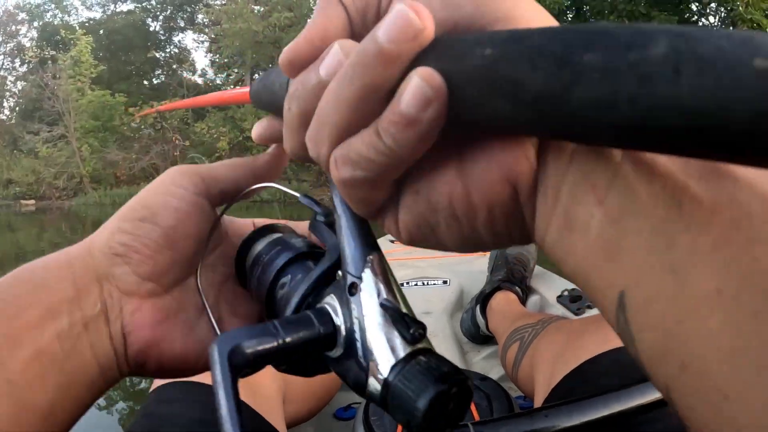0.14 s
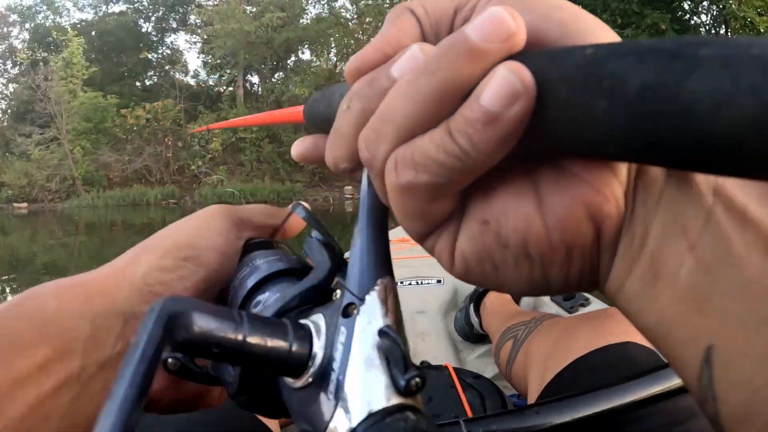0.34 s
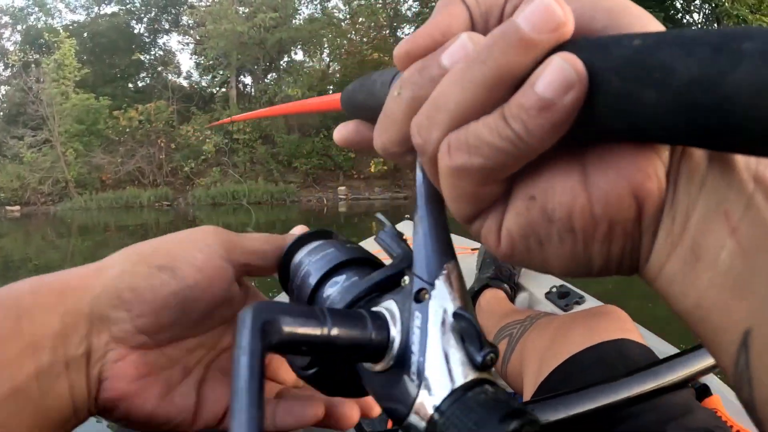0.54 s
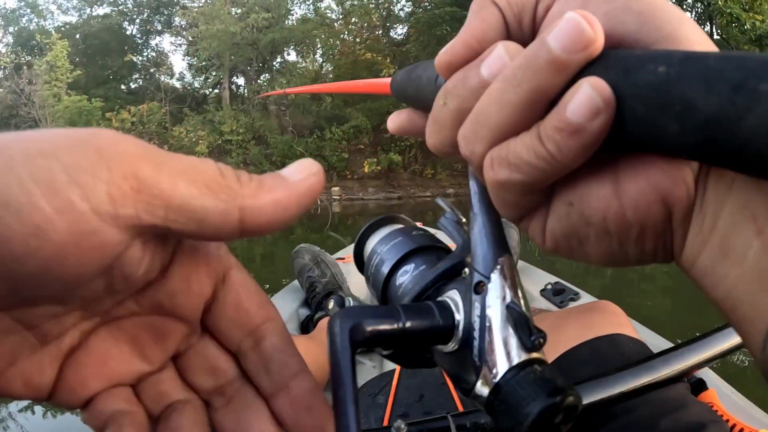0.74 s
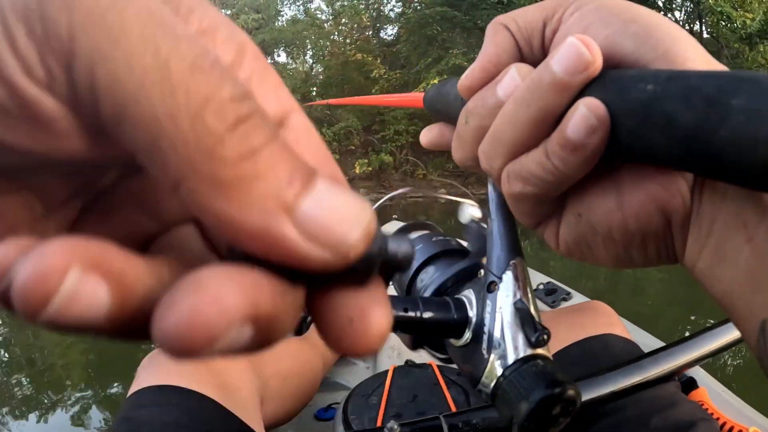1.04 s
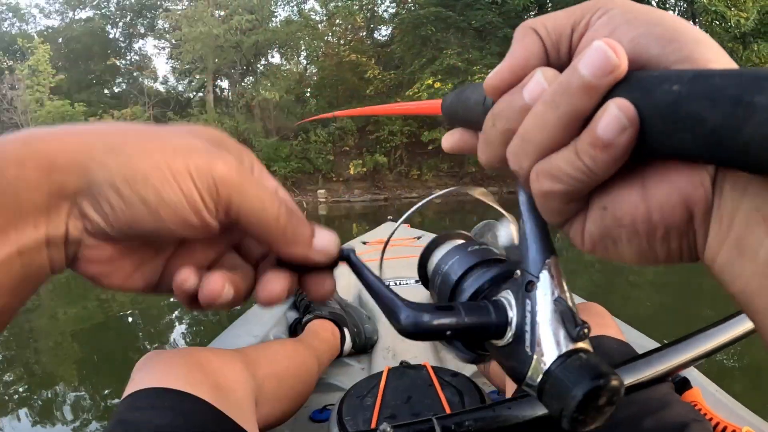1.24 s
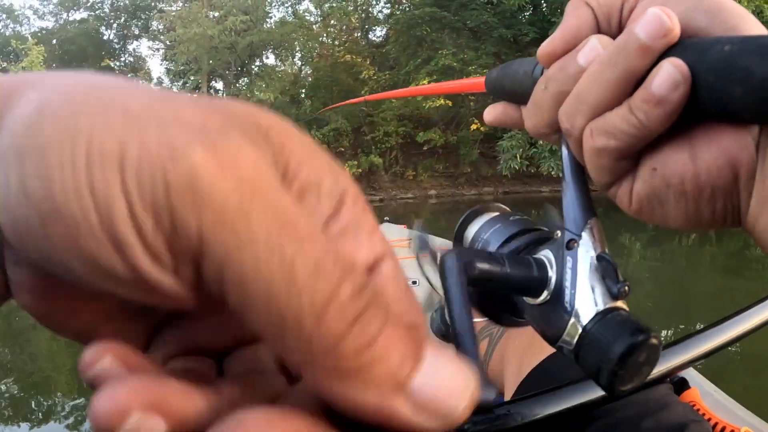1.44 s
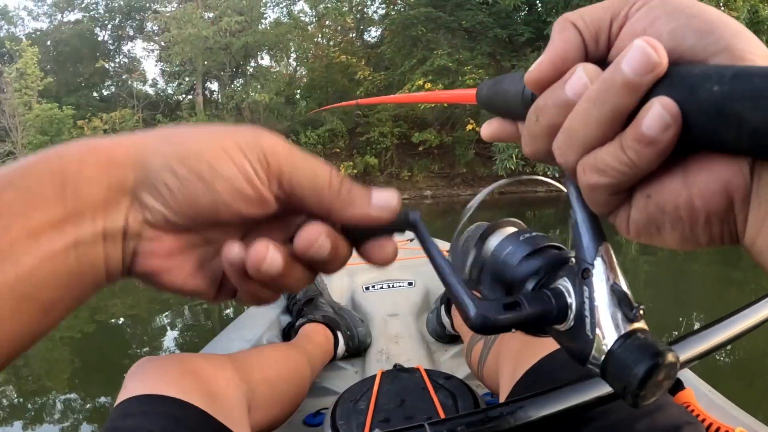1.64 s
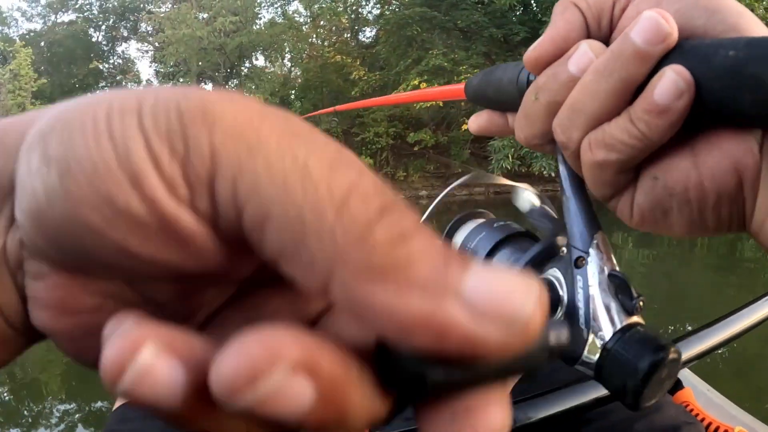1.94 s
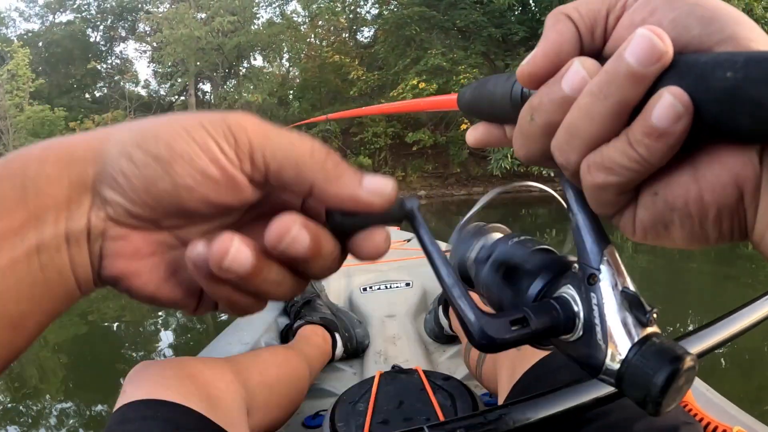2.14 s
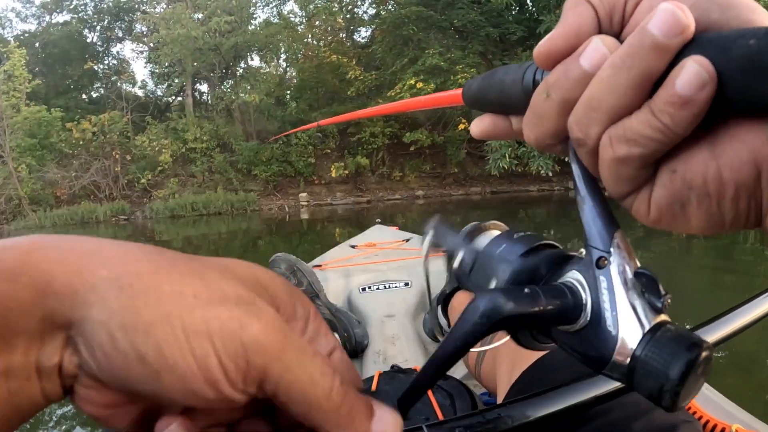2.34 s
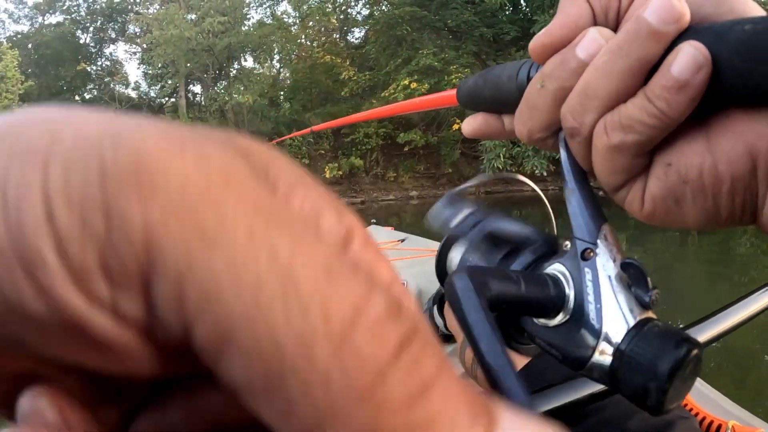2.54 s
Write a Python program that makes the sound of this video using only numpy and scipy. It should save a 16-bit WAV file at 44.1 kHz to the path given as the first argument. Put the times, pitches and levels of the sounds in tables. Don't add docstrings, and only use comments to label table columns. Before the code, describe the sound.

A fishing reel, very close, on a quiet pond with faint air hiss and high insect song. A barely audible line squeak until 0.2 s, light clicks from 0.25, then loud, bright metallic bail snaps from 0.37 to 0.7 with finger rubs and dull rod bumps. Lull; handle click at 0.98. From about 1.4 to the end, soft grainy gear whirr swells unevenly, with small knocks and a brief scrape near 1.93.

```python
import sys
import numpy as np
from scipy import signal
from scipy.fft import rfft, irfft
from scipy.io import wavfile

SR = 44100
rng = np.random.default_rng(int(sys.argv[2]) if len(sys.argv) > 2 else 0)


def bounce(signal):
    frames = np.transpose(np.atleast_2d(signal))
    limited = np.clip(frames, -1, 1)
    pcm = np.round(limited * 32767).astype(np.int16)
    wavfile.write(sys.argv[1], SR, pcm)


def invert_db(level):
    return 10 ** (np.asarray(level, dtype=float) / 20)


N = 119070

# (frequency [Hz], level [dB])
AIR_SPECTRUM = [(300, -11), (750, -15.5), (1300, -17), (2200, -24.5), (3800, -26.5), (7000, -18),
                (11000, -19.5), (15000, -28.5)]
# (frequency [Hz], shared part [0..1])
AIR_LIKENESS = [(300, 0.25), (2400, 0.24), (12000, 0.72)]
# (time [s], level [dB])
CHORUS_SWELL = [
    (0, 1.5),
    (.3, -3.5),
    (.62, -2),
    (1.2, -1.5),
    (1.65, -4),
    (2.2, 1),
    (2.45, 3.5),
    (2.7, -4.5),
]
# (time [s], thump level [dB], sway level [dB])
GRIP_MOTION = [(0, -60, -44.5), (.22, -37.5, -48.5), (.55, -46.5, -44), (.8, -49.5, -53.5),
               (.98, -56.5, -46), (1.15, -48, -45), (1.35, -49, -51.5), (1.45, -40, -46.5),
               (1.65, -44.5, -39), (1.9, -43.5, -44.5), (2.1, -53.5, -45.5), (2.4, -50, -52),
               (2.7, -44.5, -47.5)]
# (time [s], level [dB], frequency [Hz], decay time T60 [s])
ROD_BUMPS = [(0.198, -34, 119, 0.14), (0.25, -30.5, 297, 0.061), (0.379, -21.5, 240, 0.023),
             (.686, -33, 337, 0.045), (0.506, -26.5, 171, 0.096), (0.558, -30.5, 140, 0.23),
             (0.603, -27.5, 71, 0.12), (0.977, -22.5, 100, 0.056), (1.425, -34.5, 219, 0.056),
             (1.426, -37.5, 560, 0.037), (1.453, -30, 368, 0.034), (1.505, -33.5, 162, 0.11),
             (1.636, -34, 240, 0.035), (1.755, -34, 204, 0.066), (1.798, -32, 163, .07),
             (1.834, -37, 42, 0.2), (1.859, -37, 185, .08)]
# (frequency [Hz], width [Hz], level [dB])
ROD_MODES = [(140, 34, -6), (175, 43, 0), (218.3, 69, -2.5), (308, 173, -9.5)]
# (frequency [Hz], width [Hz], level [dB])
HOUSING_MODES = [(1060, 120, -1), (1300, 110, 1), (1530, 120, 0), (1800, 150, -1), (2080, 180, -7)]
# (frequency [Hz], width [Hz], level [dB])
ROTOR_MODES = [(2850, 400, -5), (3450, 500, -2), (4250, 550, 0), (4900, 450, 0), (5700, 700, -4),
               (6900, 700, -4), (8300, 1200, -10)]
# (time [s], housing level [dB], rub level [dB])
FINGER_SLIDES = [(0, -55.5, -60), (.16, -60.5, -64), (.26, -52.5, -57), (.42, -49.5, -56.5),
                 (.47, -39.5, -44), (.56, -43.5, -45.5), (.62, -43.5, -47), (.68, -51, -44.5),
                 (0.712, -43.5, -48.5), (0.753, -67, -86), (.95, -56.5, -81)]
# (time [s], housing level [dB], housing pitch [Hz], wire level [dB], wire pitch [Hz])
BAIL_SNAPS = [(.249, -27, 1260, -18.5, 6520), (.263, -24.5, 1330, -38, 5800),
              (.304, -26.5, 1510, -31.5, 6400), (.332, -28.5, 1090, -29.5, 4280),
              (.375, -7, 1378, -35, 5340), (.378, -10.5, 1532, -6.5, 4870), (.3785, -33, 2120, -17, 3217),
              (.430, -5, 1684, -21, 5340), (.5085, -10, 1510, -18, 3000), (.519, -31, 1180, -22, 3740),
              (.5435, -12, 1483, -13, 5630), (.549, -16, 1860, -19, 5150), (.587, -9, 1055, -20.5, 3000),
              (.591, -16, 2160, -21, 4840), (.596, -15, 1175, -14.5, 5550), (.6655, -31, 1920, -31, 5500),
              (.685, -13, 1500, -8.5, 4870), (.967, -24.5, 1430, -32, 4740),
              (.9755, -16, 1953, -22.5, 5000), (.977, -19, 1130, -28.5, 3000),
              (1.032, -32, 1540, -40.5, 5060), (1.0605, -33, 1200, -36.5, 2920)]
# (time [s], housing level [dB], housing pitch [Hz], wire level [dB], wire pitch [Hz])
GEAR_KNOCKS = [(1.357, -48, 1580, -30.5, 3130), (1.360, -47, 1590, -31.5, 4950),
               (1.3996, -48, 1300, -39, 5070), (1.425, -41, 1150, -41, 3500), (1.445, -45, 1930, -31, 4770),
               (1.452, -19.5, 1310, -46, 4860), (1.464, -24, 1320, -52, 4000),
               (1.4755, -27, 2000, -37, 2920), (1.482, -24, 1207, -44, 4050), (1.497, -44, 1500, -33, 3940),
               (1.5303, -46, 1300, -36, 4740), (1.5587, -31, 1260, -38.5, 2860),
               (1.68, -27.5, 1250, -50, 4020), (1.697, -40, 1300, -39, 4200), (1.710, -27, 1260, -31, 3970),
               (1.7965, -23, 1250, -34, 3100), (1.8035, -45, 1300, -37, 4800),
               (1.868, -30, 1920, -40, 4230), (1.9374, -40, 1600, -40, 5070),
               (2.0237, -40, 1500, -40, 4200), (2.139, -40, 1520, -48, 4200), (2.152, -30, 1530, -30, 4600),
               (2.170, -24.5, 1580, -39, 4200), (2.186, -19.5, 1490, -36, 4320),
               (2.223, -41, 1750, -33.5, 3310), (2.3764, -42, 1530, -35.5, 4900),
               (2.381, -25, 1810, -40, 4960), (2.394, -29.5, 1230, -42, 4200),
               (2.411, -22, 1866, -45, 4170), (2.417, -35, 1950, -45, 4200),
               (2.4313, -25, 1450, -30.5, 4880), (2.445, -38, 1590, -30.5, 4200),
               (2.462, -23, 1350, -48, 4200), (2.5056, -34, 1640, -32.5, 4350)]
# (time [s], gear load [dB], rotor rub [dB], lift of the whirr's pitch [steps])
CRANK_EFFORT = [(1.0, -48, -43.5, -1), (1.1, -56, -62.5, -7), (1.27, -52, -58.5, 0.5),
                (1.44, -42.5, -45.5, 1), (1.6, -45, -50, 1.5), (1.7, -45, -49.5, 2), (1.84, -43, -48.5, 0),
                (2.0, -40, -46.5, 5), (2.23, -39, -50.5, 4.5), (2.28, -49, -60.5, 4),
                (2.36, -37.5, -45.5, 6), (2.5, -46.5, -47.5, 4), (2.54, -51, -51.5, 0.5),
                (2.7, -47.5, -52.5, -5.5)]
# (time [s], length [s], gear level [dB], rub level [dB])
HANDLE_PUSHES = [
    (1.412, 0.059, -38, -70),
    (1.862, 0.068, -39.5, -41),
    (1.921, 0.014, -50, -37.5),
    (1.931, 0.024, -53, -32),
    (2.145, 0.006, -47, -34),
    (2.22, 0.012, -47, -45.5),
    (2.363, 0.067, -37, -43),
]

TEETH_PER_S, RUB_PER_S, THUMPS_PER_S = 700, 3600, 140
HOUSING_T60_S, WIRE_T60_S, CRACK_T60_S = 0.04, 0.026, 0.0052
HOUSING_RISE_S, HOUSING_TAIL_DB = 0.00072, -10.5
CRACK_DB, CRACK_TAIL_DB, RISE_S = 4.5, -8, 0.00067
LINE_HZ, LINE_DB, LINE_END_S = 3000, -62, 0.178
AIR_DB, SWAY_HZ, SPREAD_DB = -53, 60, -10.5
LAG_RAD, LAG_KNEE_HZ, TOP_HZ = 0.72, 840, 13400


def unit(x):
    return x / np.sqrt(np.mean(x ** 2) + 1e-20)


def in_time(rows):
    s, *columns = np.transpose(rows)
    return [np.interp(np.arange(N) / SR, s, c) for c in columns]


def drift(rate):
    r = np.exp(-80 * np.pi * rate / SR)
    steps = rng.standard_normal(N // 40 + 2002)
    slow = signal.lfilter([1], [1, -2 * r, r * r], steps)[2000:]
    return np.interp(np.arange(N) / 40, np.arange(len(slow)), unit(slow))


def peak(x, hz, width_hz):
    r = np.exp(-np.pi * width_hz / SR)
    feedback = [1, -2 * r * np.cos(2 * np.pi * hz / SR), r * r]
    return signal.lfilter([(1 - r * r) / 2, 0, (r * r - 1) / 2], feedback, x)


def band(x, low_hz, high_hz):
    sos = signal.butter(2, [low_hz, min(high_hz, .45 * SR)], "band", fs=SR, output="sos")
    return signal.sosfilt(sos, x)


def grainy(body, per_s, spread_db, patchy_db, flicker, narrow_db=0, lift=0, tick=3.86, ridge_db=0):
    out, shared = 0, drift(3 * flicker)
    ticks = invert_db(3 * np.minimum(rng.exponential(1, N), 4)) * (rng.random(N) < per_s / 25 / SR)
    for hz, width_hz, db in body:
        sizes = invert_db(spread_db * np.minimum(rng.exponential(1, (2, N)), 4)) * rng.choice([-1, 1], (2, N))
        contacts = sizes * (rng.random((2, N)) < per_s / SR)
        contacts = contacts + tick * ticks * rng.uniform(0.22, 1, N) + 1e-18
        mid, side = peak(peak(contacts, hz, width_hz), hz, 2 * width_hz)
        off = (np.log2(hz / 1450) - lift) ** 2
        waver_db = patchy_db * (drift(flicker) + 0.33 * shared)
        gain = invert_db(db - narrow_db * off + ridge_db * np.exp(-off / 0.028) + waver_db)
        out = out + gain * (unit(mid) + invert_db(SPREAD_DB) * unit(side) * [[1], [-1]])
    return unit(out)


def hits(rows, wire_pan_db, housing_pan_db, crack_hz):
    out = np.zeros((2, N + SR))
    t = np.arange(SR // 16) / SR
    sides = np.array([[.5], [-.5]])

    def fall(t60):
        return invert_db(-60 * t / t60) * (1 - np.exp(-(t / RISE_S) ** 2))

    housing_tail = invert_db(HOUSING_TAIL_DB - 60 * t / HOUSING_T60_S)
    swell = (1 - np.exp(-(t / HOUSING_RISE_S) ** 2)) * (np.exp(-(t / .0028) ** 2) + housing_tail)
    snap = (1 - np.exp(-(t / 0.00081) ** 2)) * np.exp(-(t / 0.0018) ** 2)
    for s, low_db, low_hz, high_db, high_hz in rows:
        noise = rng.standard_normal((2, len(t)))
        odd = rng.uniform(0, 1, 6)
        low_modes = [(1.0005, 0.55), (0.767, 0.22 * odd[0]), (1.274, 0.34 * odd[1])]
        low = sum(g * np.sin(2 * np.pi * low_hz * k * t) for k, g in low_modes)
        high_modes = [(0.965, 1, 0.0068), (1.106, 0.58, odd[2]), (1.506, 0.5 * odd[5] + 0.055, odd[3]),
                      (0.66, 0.26, odd[4]), (1.263, 0.42, odd[1])]
        high = sum(g * np.sin(2 * np.pi * high_hz * k * t + 6 * p) for k, g, p in high_modes)
        burst = noise * fall(CRACK_T60_S) + invert_db(CRACK_TAIL_DB) * noise * fall(0.014)
        crack = invert_db(CRACK_DB) * band(burst, 0.53 * high_hz, min(crack_hz, 1.65 * high_hz))
        housing = invert_db(low_db + housing_pan_db * sides) * low * swell
        wire = high * (snap + 0.16 * fall(WIRE_T60_S)) + crack[0] + 0.5 * crack[1] * sides
        wire = invert_db(high_db + wire_pan_db * sides) * wire
        start = int(s * SR)
        out[:, start:start + len(t)] += 1.2 * (housing + wire)
    return out[:, :N]


def air():
    out = 0
    edges = 200 * 2 ** np.arange(0, 6.6, .5)
    white = rng.standard_normal((2, 2, N))

    def at(points, hz):
        known_hz, values = np.array(points).T
        return np.interp(np.log(hz), np.log(known_hz), values)

    chorus_db = in_time(CHORUS_SWELL)[0] + [[2.2], [-2.2]]
    for k, (low, high) in enumerate(zip(edges, edges[1:])):
        mid, side = band(white[k % 2], low, high)
        centre = np.sqrt(low * high)
        alike = np.clip(at(AIR_LIKENESS, centre), 0, 1)
        bright = np.clip(np.log2(low / 2500) / 2, 0, 1)
        gain = invert_db(at(AIR_SPECTRUM, centre) + 2.1 * drift(34) + bright * chorus_db)
        out = out + gain * (np.sqrt(1 + alike) * mid + np.sqrt(1 - alike) * side * [[1], [-1]])
    insect = unit(peak(white[0], 10630, 370))
    return invert_db(AIR_DB) * (unit(out) + invert_db(-8.5) * insect) * invert_db([[-.3], [.3]])


def line():
    t = np.arange(N) / SR
    gate = np.clip((LINE_END_S - t) / 0.037, 0, 1)
    flutter = 1 + .5 * np.sin(2 * np.pi * 27 * t - 2.5)
    squeak = unit(peak(peak(rng.standard_normal(N), LINE_HZ, 260), LINE_HZ, 400))
    return invert_db(LINE_DB + 3.4 * drift(32)) * flutter * gate * squeak


def rod():
    thump, sway_db = in_time(GRIP_MOTION)
    sway = band(rng.standard_normal((2, N)), 5.6, SWAY_HZ)
    sway = unit(sway[0] + 0.18 * sway[1] * [[1], [-1]])
    sway = invert_db(sway_db + 0.97 * drift(3.6)) * sway
    body = 0.27 * unit(band(rng.standard_normal(N), 143, 606))
    bumps = 0
    for s, db, hz, t60 in ROD_BUMPS:
        after = np.clip(np.arange(N) / SR - s, 0, None)
        envelope = invert_db(db - 60 * after / t60) * (1 - np.exp(-after * hz * 1.82))
        bumps = bumps + envelope * (np.sin(2 * np.pi * hz * after) + body * hz / 200)
    rumble = grainy(ROD_MODES, THUMPS_PER_S, spread_db=1.0, patchy_db=1.5, flicker=13.7, tick=0)
    return (invert_db(thump) * rumble + 1.48 * bumps) * invert_db([[-.8], [.8]]) + sway


def reel():
    t = np.arange(N) / SR
    cranking = np.clip((t - .96) / 0.12, 0, 1)
    finger_load, finger_rub = in_time(FINGER_SLIDES)
    crank_load, crank_rub, lift = in_time(CRANK_EFFORT)
    load = invert_db(finger_load) * (1 - cranking) + invert_db(crank_load) * cranking
    rub = invert_db(finger_rub) * (1 - cranking) + invert_db(crank_rub) * cranking
    pushing = 0
    for s, length, gear_db, rub_db in HANDLE_PUSHES:
        swell = np.clip((t - s) / 0.0089, 0, 1) * np.clip(1 + (s + length - t) / 0.03, 0, 1)
        pushing = np.maximum(pushing, swell)
        load = np.hypot(load, invert_db(gear_db) * swell)
        rub = np.hypot(rub, invert_db(rub_db) * swell)
    whirr = grainy(HOUSING_MODES, TEETH_PER_S, spread_db=3.0, patchy_db=1.93, flicker=27, tick=3.8,
                   narrow_db=11.5, lift=0.089 * lift)
    scrape = grainy(ROTOR_MODES, RUB_PER_S, spread_db=1.5, patchy_db=2.5, flicker=61, tick=3.8,
                    narrow_db=6.0 - 3.9 * cranking + 4.1 * pushing, lift=2.1 - 0.96 * cranking)
    gears = load * whirr * invert_db([[-.9], [.9]])
    rotor = rub * scrape * invert_db([[-.6], [.6]])
    snaps = hits(BAIL_SNAPS, 1.6, 0.1, 12700)
    knocks = hits(GEAR_KNOCKS, -1.1, -2.8, 7200)
    return gears + rotor + snaps + knocks


def scene():
    background = air()
    near = line() + rod() + reel()
    hz = np.arange(N // 2 + 1) * SR / N
    lag = np.exp(-1j * LAG_RAD * np.tanh(hz / LAG_KNEE_HZ))
    near[0] = irfft(rfft(near[0]) * lag, N)
    return background + near


def roll_off(x):
    return signal.sosfilt(signal.butter(12, 16480, fs=SR, output="sos"), x)


def record(dry):
    rounded = 0.89 * np.tanh(dry / 0.91)
    mix = signal.sosfilt(signal.butter(4, TOP_HZ, fs=SR, output="sos"), rounded)
    return roll_off(mix)


dry = scene()
out = record(dry)
bounce(out)
```